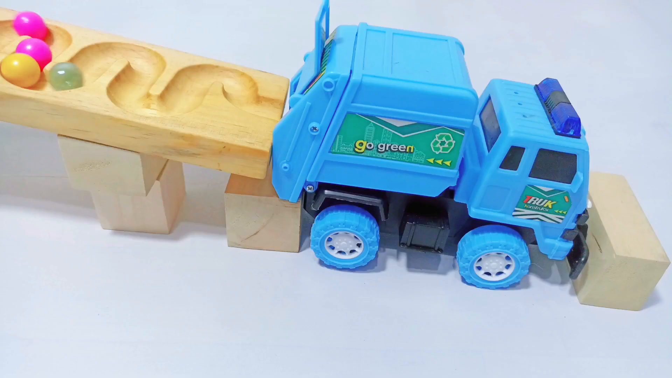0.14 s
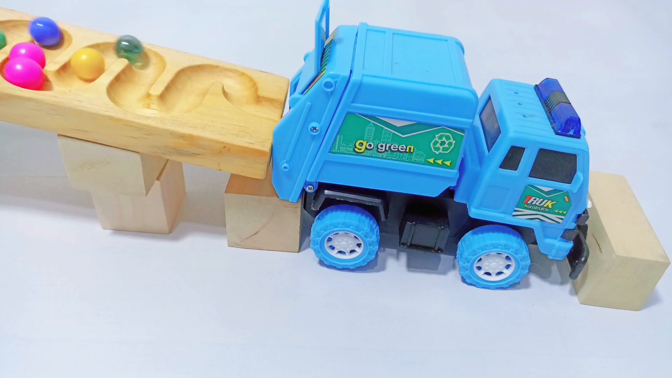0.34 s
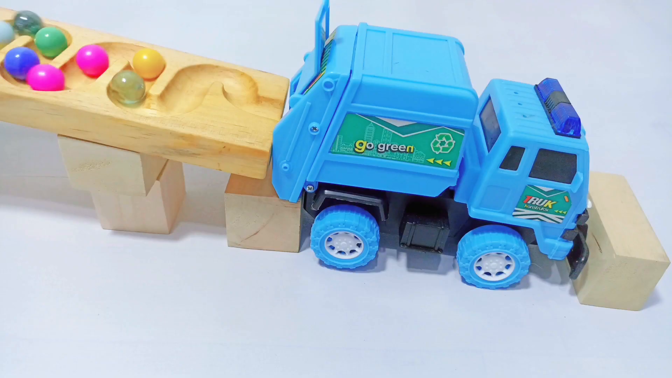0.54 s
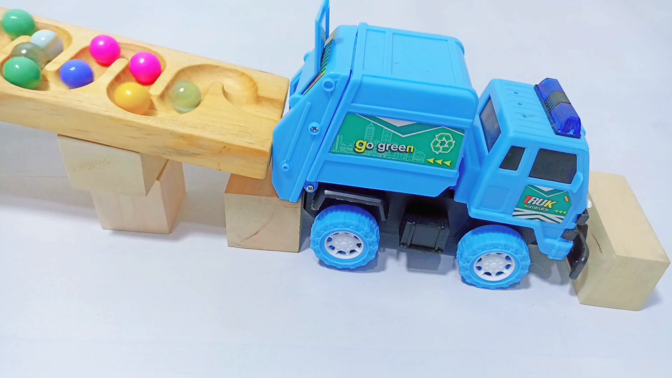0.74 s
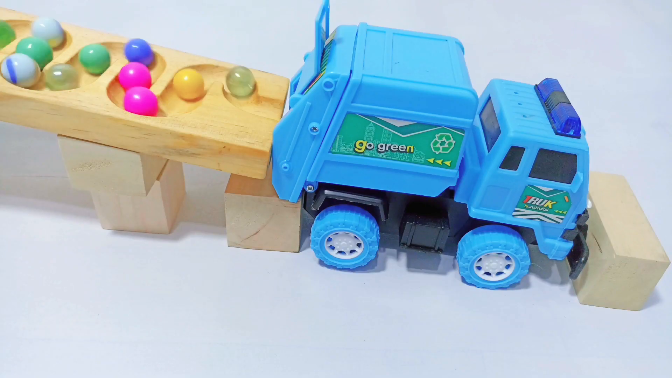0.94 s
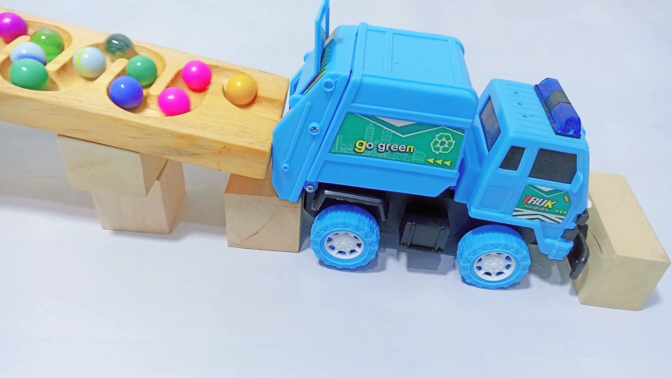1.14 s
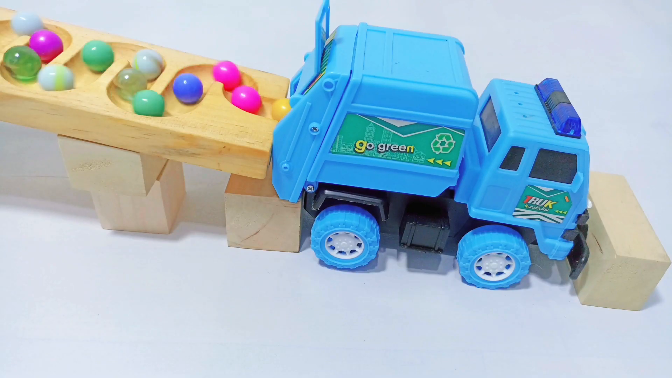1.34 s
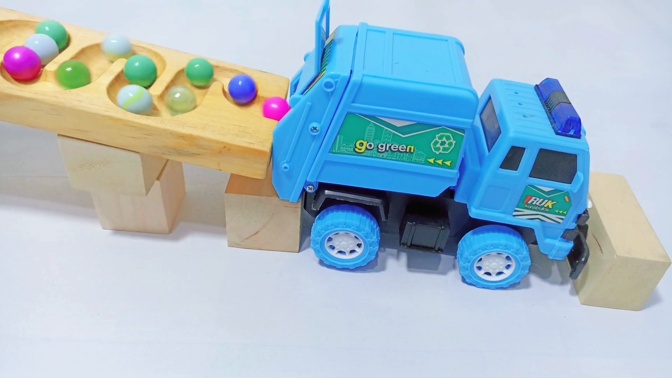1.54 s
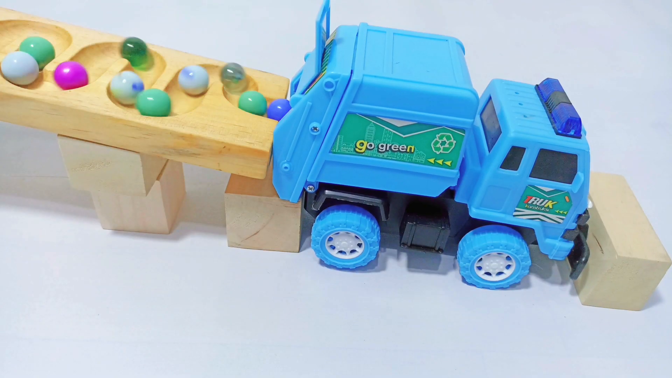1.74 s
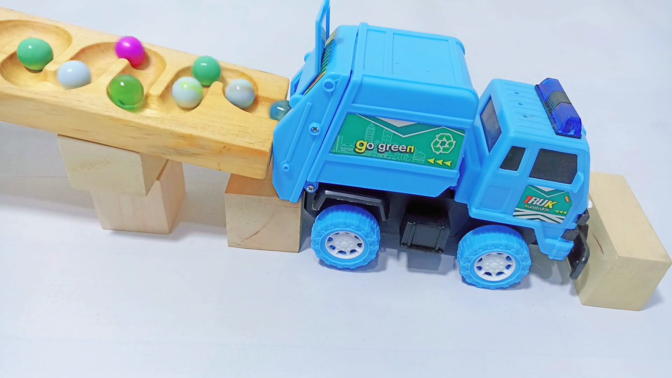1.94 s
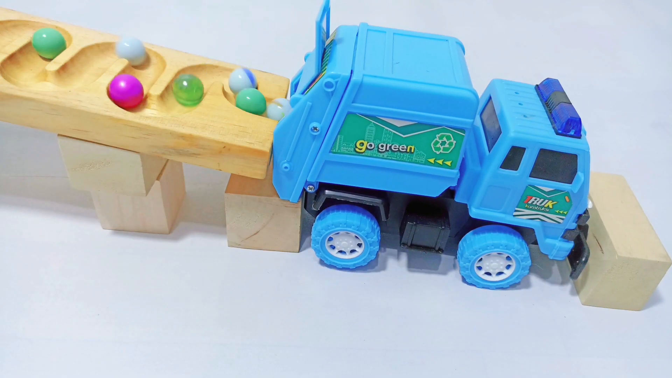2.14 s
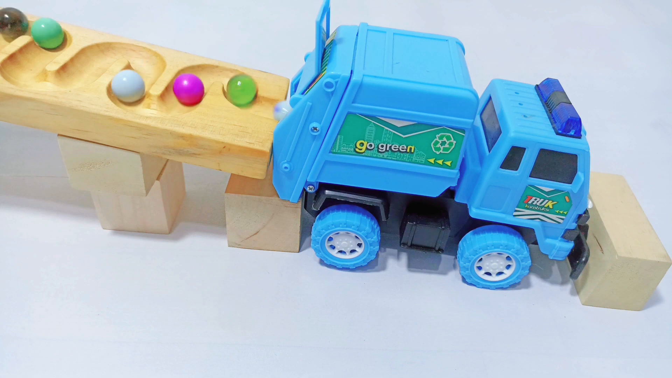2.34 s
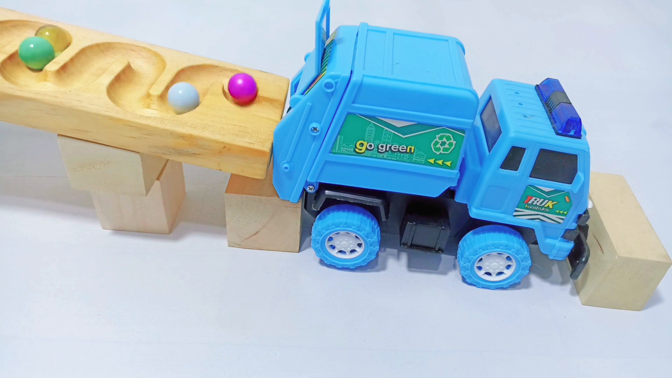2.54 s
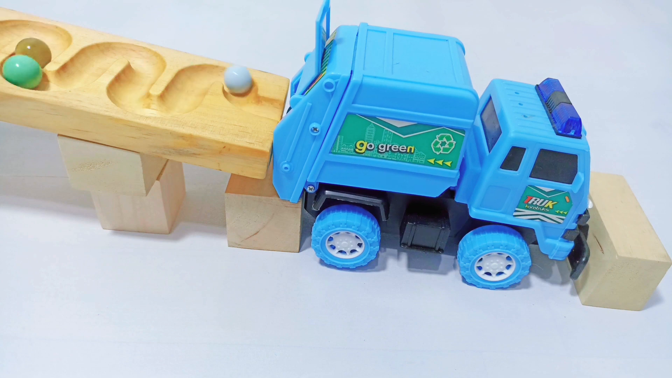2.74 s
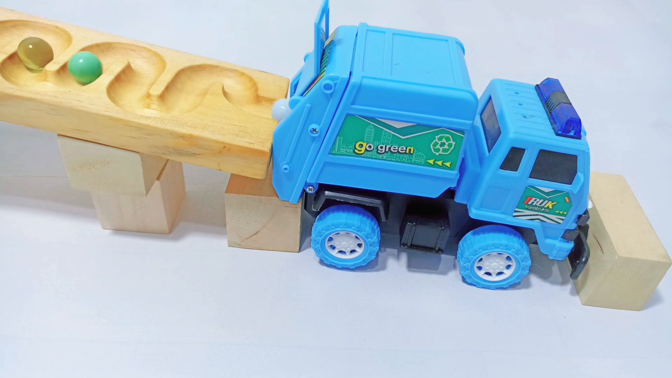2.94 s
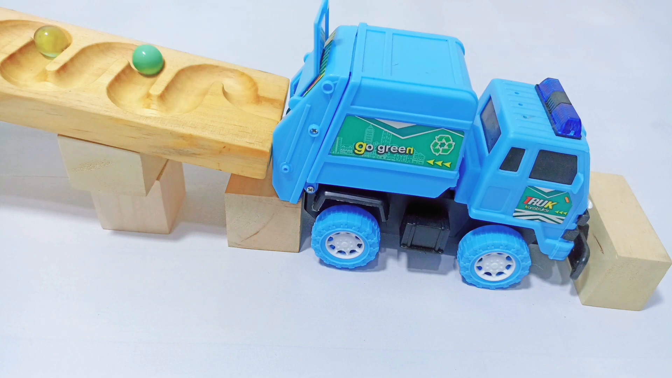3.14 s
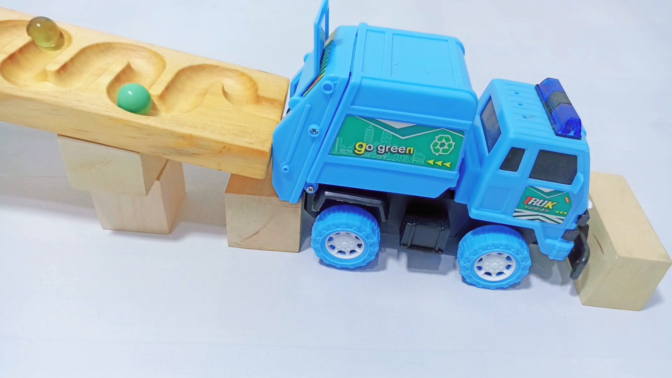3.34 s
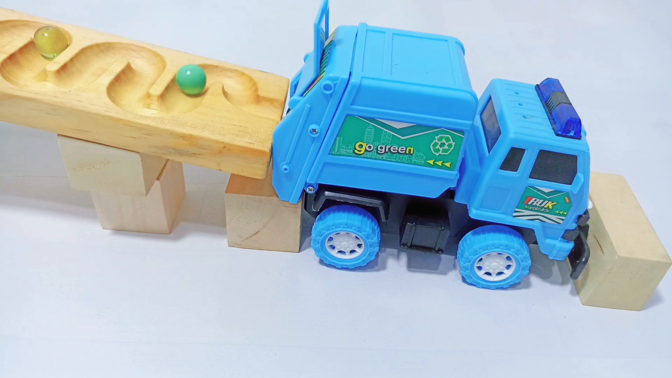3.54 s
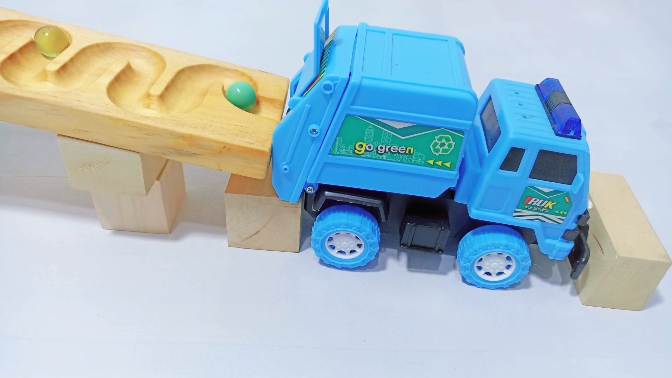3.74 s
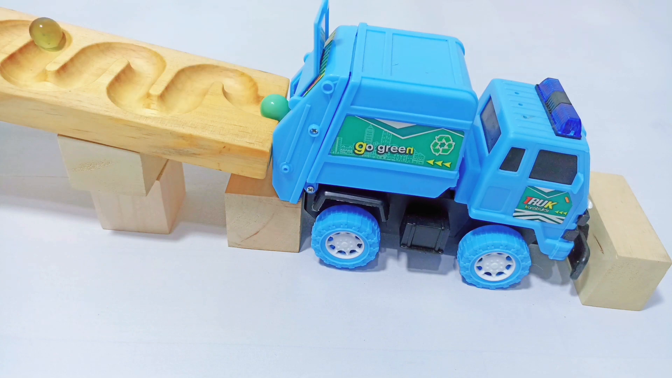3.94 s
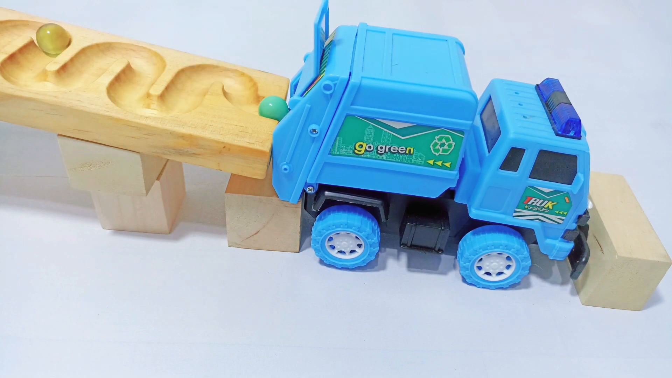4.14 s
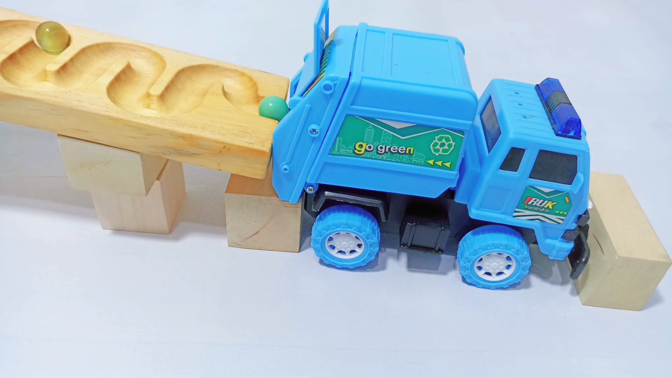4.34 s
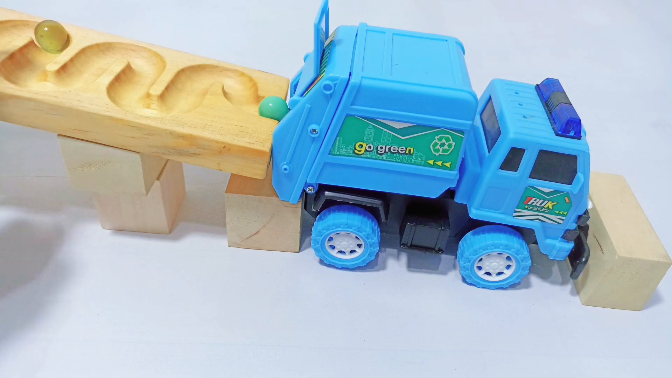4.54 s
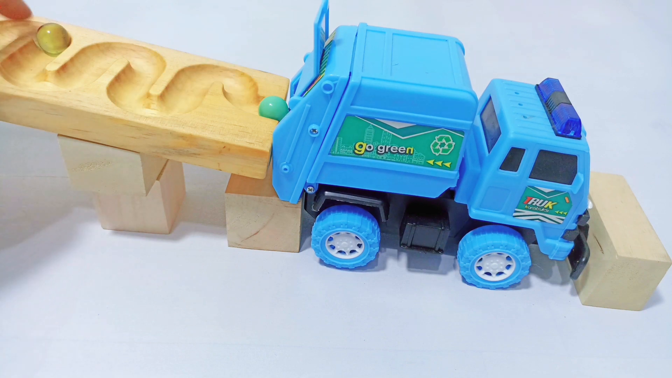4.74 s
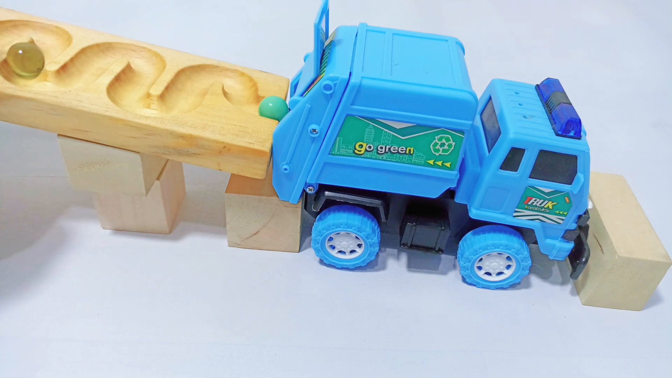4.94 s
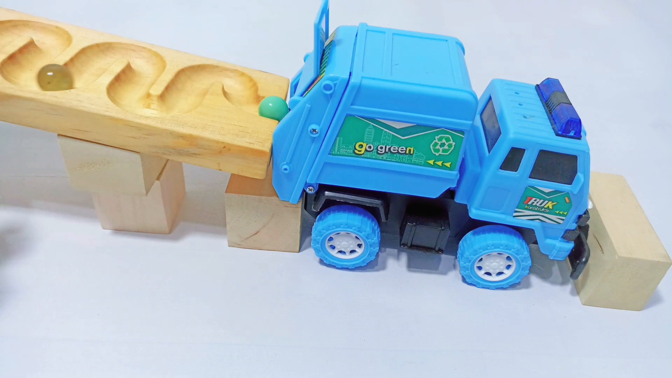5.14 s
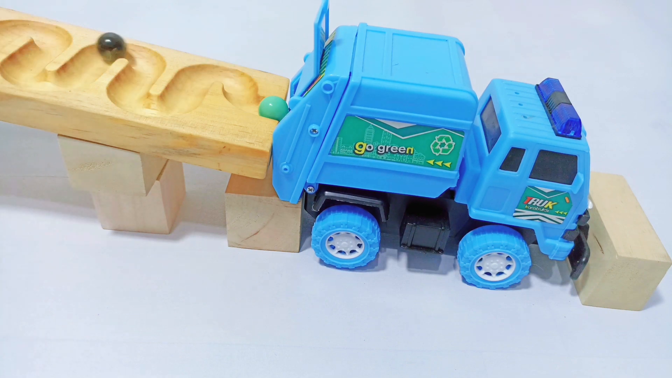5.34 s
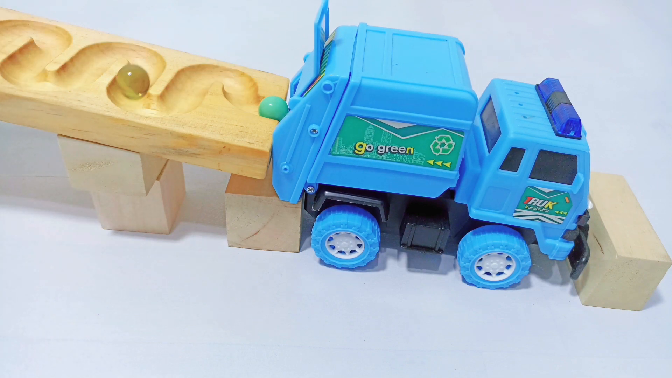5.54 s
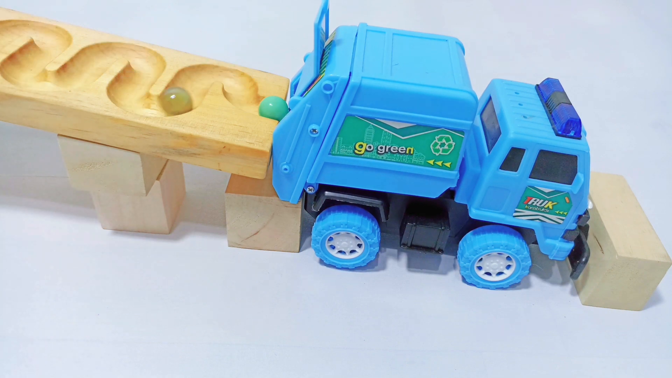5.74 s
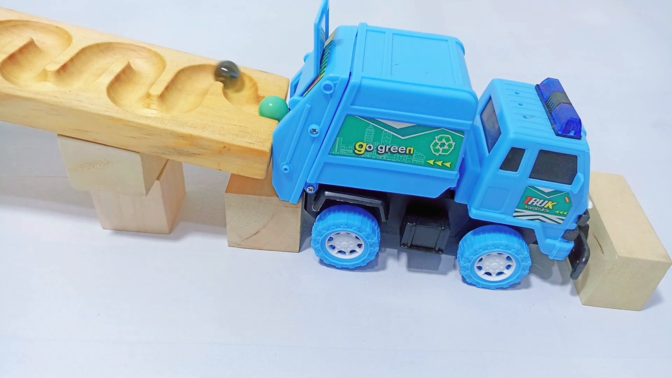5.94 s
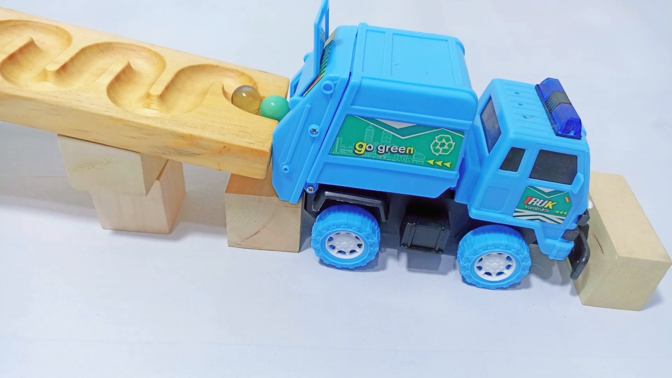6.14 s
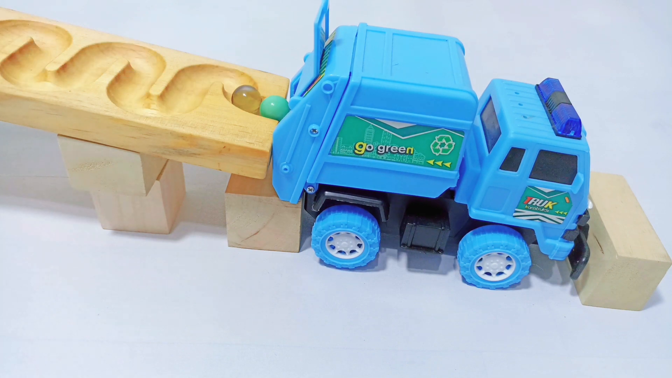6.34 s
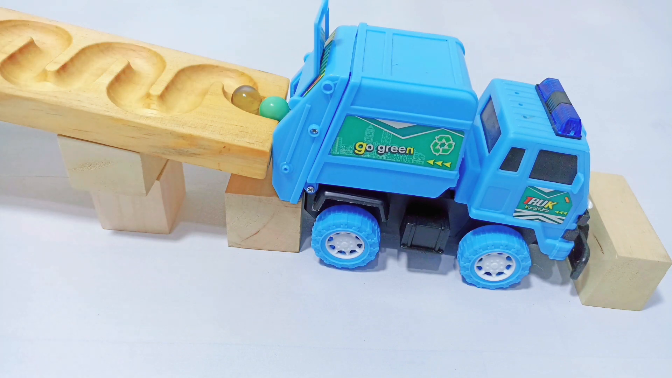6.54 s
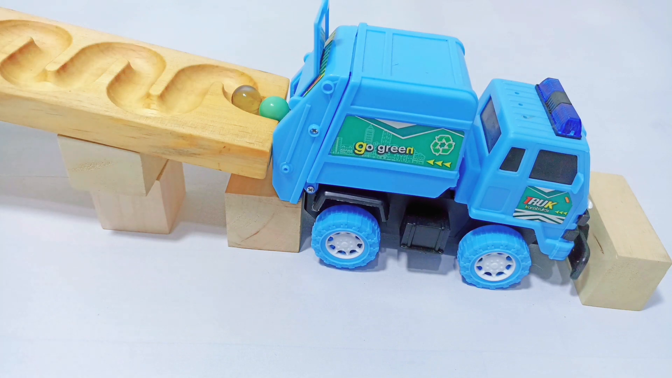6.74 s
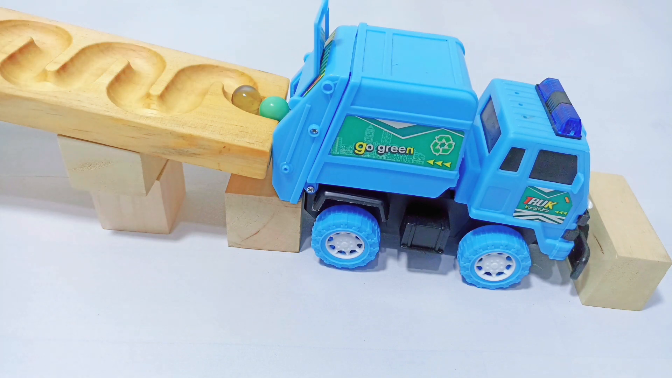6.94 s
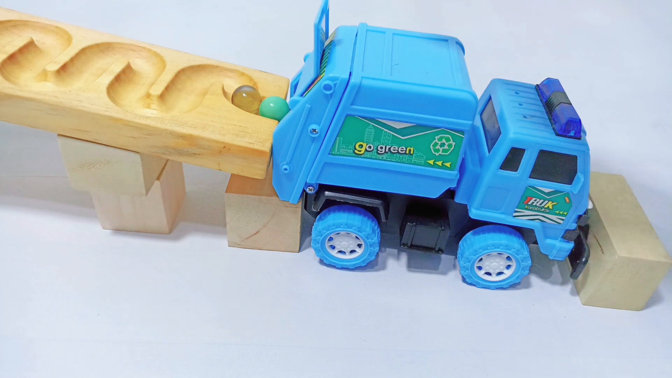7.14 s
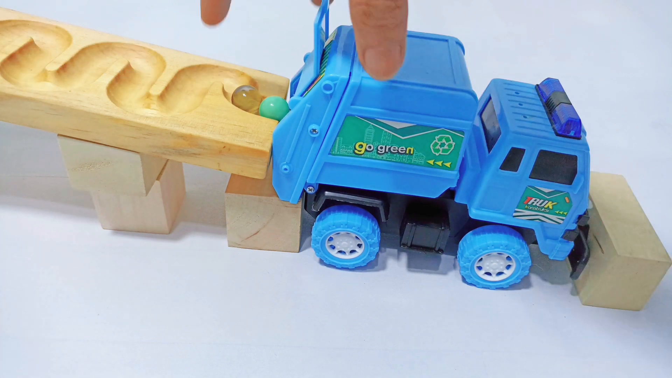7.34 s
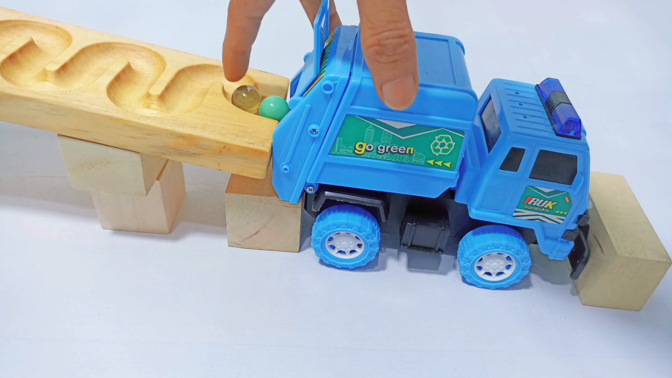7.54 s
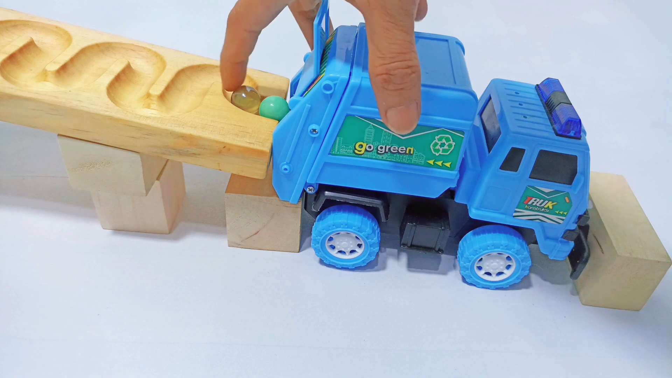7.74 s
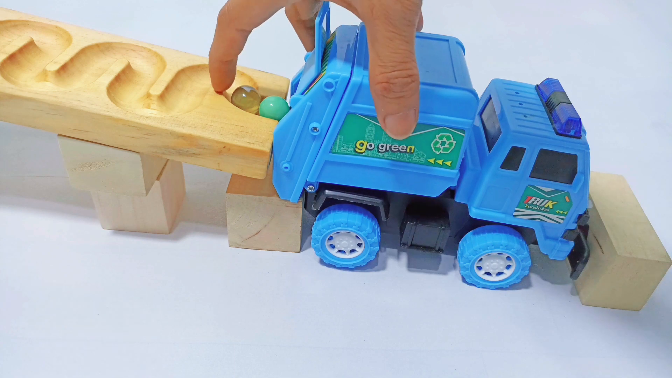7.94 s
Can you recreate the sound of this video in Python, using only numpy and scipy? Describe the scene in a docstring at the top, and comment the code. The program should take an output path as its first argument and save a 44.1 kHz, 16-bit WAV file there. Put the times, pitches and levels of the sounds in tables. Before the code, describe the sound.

A pack of glass marbles rattles down a wooden zigzag ramp and clatters into a hollow plastic bin, then two stragglers roll slowly after.

```python
"""A small quiet room, heard through two close microphone ports: glass marbles roll down a wooden ramp.
They follow its zigzag groove and drop into the hollow plastic bin of a toy truck; two stragglers follow.
Random tiny bumps make the rolling rumble; timed blows make ringing wood knock and ringing plastic clatter.
Short bursts of shaped noise are the glass clicks. At the end fingers rub and squeak on the truck.
Faint squeals, soft air noise and a short room tail lie behind it all."""
import sys
import numpy as np
from scipy import signal
from scipy.fft import rfft, irfft
from scipy.io import wavfile
from scipy.ndimage import uniform_filter1d

SR = 44100
rng = np.random.default_rng(int(sys.argv[2]) if len(sys.argv) > 2 else 0)


def inscribe(sig):
    """Save sig as 16-bit PCM at rate SR to the path in sys.argv[1].

    A 1-D sig is mono; a 2-D sig holds one channel per row.
    Samples are clipped to [-1, 1] before scaling.
    """
    pcm = np.round(np.clip(np.atleast_2d(sig).T, -1, 1) * 32767)
    wavfile.write(sys.argv[1], SR, pcm.astype(np.int16))


N = 356328  # length [samples]
RING = np.arange(4096) / SR  # time within one blow [s]


def amp(db):
    """Turn decibels into a gain."""
    return 10 ** (np.asarray(db) / 20)


def unit(x):
    """Scale a blow so that its energy equals 5 ms of sound at 0 dB."""
    energy = np.mean(np.sum(x ** 2, axis=-1))
    return x / np.sqrt(energy / (0.005 * SR))


def level(x, db):
    """Scale a steady sound to an rms level."""
    return x * amp(db) / np.sqrt(np.mean(x ** 2))


def convolve(x, response):
    """Pass a sound through a response, keeping its length."""
    full = signal.oaconvolve(np.atleast_2d(x), np.atleast_2d(response), axes=-1)
    return full[:, :x.shape[-1]]


def colour(x, points, size=2048):
    """Filter a sound to a (frequency [Hz], level [dB]) shape, with no sound before its cause."""
    hz, db = np.transpose(points)
    grid = np.maximum(np.fft.rfftfreq(size, 1 / SR), 1)
    shape_db = np.interp(np.log(grid), np.log(hz), db)
    # folding the cepstrum forward in time gives the minimum-phase filter
    cepstrum = irfft(np.log(amp(shape_db)))
    cepstrum[1:size // 2] *= 2
    cepstrum[size // 2 + 1:] = 0
    return convolve(x, irfft(np.exp(rfft(cepstrum))))


def split(x, hz):
    """Give the parts of a sound below and above a frequency."""
    filters = [signal.butter(4, hz, kind, fs=SR, output="sos") for kind in ("low", "high")]
    return [signal.sosfilt(sos, x) for sos in filters]


def fade(t, t60):
    """Decay exponentially, 60 dB down after t60 [s]."""
    return np.exp(-np.log(1000) * t / t60)


def walk(rate):
    """Wander smoothly between random values drawn at a rate [per s], with a spread near 1."""
    step = int(SR / rate)
    held = np.repeat(rng.standard_normal(N // step + 1), step)
    return uniform_filter1d(held, step)[:N]


def pair_noise(count, apart_hz):
    """Make noise at the two ports: alike in the bass, unrelated above apart_hz."""
    mid, side = rng.standard_normal((2, count))
    side = signal.lfilter(*signal.butter(1, apart_hz, "high", fs=SR), side)
    return np.array([mid + side, mid - side])


def add(track, s, sound):
    """Mix a sound into a track at time s."""
    start = max(int(s * SR), 0)
    part = sound[:, :N - start]
    track[:, start:start + part.shape[1]] += part


def favour(blow, hz, boost_db, q=5.7):
    """Favour the modes around one pitch by adding that narrow band again."""
    band = signal.lfilter(*signal.iirpeak(hz, max(q, 1), fs=SR), blow)
    return blow + amp(boost_db) * band


def body(modes, crowd, crowd_db, crowd_t60, lead_s, place_db=2.5, detune=0.008, stray=0.32,
         build_cycles=0.5, spread_s=0.0011):
    """Strike a body: clear modes, weighted by a random place of contact, over a crowd of weaker ones."""
    hz, t60, db, lead = np.transpose(modes)[:, :, None]
    weight, shift, phase, skew = rng.standard_normal((4, len(modes), 1))
    turn = 2 * np.pi * hz * (1 + detune * shift) * RING + np.pi * phase
    size = amp(db + place_db * weight) * fade(RING, t60) / np.sqrt(t60)
    size *= 1 - np.exp(-(RING * hz / build_cycles) ** 2)  # low modes take longer to get going
    lead = lead + stray * skew
    clear = np.array([np.sum(size * np.sin(turn + side * lead / 2), axis=0) for side in (1, -1)])
    spread = 1 - np.exp(-(RING / spread_s) ** 2)  # the blow takes a moment to spread over the body
    dense = colour(pair_noise(len(RING), 1600) * fade(RING, crowd_t60) * spread, crowd)
    dense[1] = np.interp(RING - lead_s, RING, dense[1], left=0)  # the crowd is later at the right port
    return unit(clear) + amp(crowd_db) * unit(dense)


def harden(blow, clack_db):
    """A harder contact puts more into the high modes (clack) than into the low ones (boom)."""
    boom, clack = split(blow, 1900)
    return unit(boom) + amp(clack_db) * unit(clack)


def bounce(track, s, db, loss_db, blow, count=3):
    """Play a blow and its two rebounds, each weaker than the last, at roughly even gaps."""
    hop_s, scatter = 0.021, 0.15  # usual gap, and how far chance stretches or shortens it
    for k, chance in enumerate(rng.standard_normal(count)):
        add(track, s, amp(db - k * loss_db) * blow)
        s += hop_s * np.exp(scatter * chance)


def rolling(motion, blow, bumps_per_s, spread_db, sway_db, count=5):
    """Moving contacts ride over tiny bumps; each rings the body from its own place, swelling and easing."""
    out = 0
    for _ in range(count):
        at = np.flatnonzero(rng.random(N) < bumps_per_s / SR)
        size, side = rng.standard_normal((2, len(at)))
        bumps = np.zeros(N)
        bumps[at] = np.sign(side) * amp(spread_db * size + sway_db * walk(14)[at])
        out = out + convolve(bumps, blow())
    return level(out, 0) * motion


# Tone of the still room's air, before its overall level is set: (frequency [Hz], level [dB per Hz])
AIR_TONE = [(20, -21), (48, -14.5), (65, 4.5), (100, 8.5), (200, 1), (320, -4.5), (500, -12), (1000, -19.5),
            (2200, -19), (3300, -24.5), (5000, -24.5), (8000, -31.5), (12000, -38), (16000, -37.5)]


def room_air(air_db=-56.5):
    """A low room rumble with thin hiss, made of filtered noise that swells slowly."""
    swell = amp(1.2 * walk(2.4))
    return level(colour(pair_noise(N, 130), AIR_TONE), air_db) * swell


# Faint far-off squeals: (time [s], length [s], middle pitch [Hz], level before its flutter [dB])
FAR_SQUEALS = [(6.99, 0.16, 2460, -67), (7.14, 0.12, 2450, -78), (7.668, 0.22, 2363, -68),
               (7.85, 0.08, 2365, -70.5)]


def far_squeals(octave_db=-10, sag=0.0063):
    """Wavering tones with a weak octave above; their pitch arches up and down a little."""
    out = np.zeros((2, N))
    for s, length, hz, db in FAR_SQUEALS:
        u = np.linspace(0, 1, int(length * SR))  # progress through the squeal, 0 to 1
        pitch = hz * (1 - sag * (2 * u - 1) ** 2 + 0.0044 * walk(54)[:len(u)])
        phase = 2 * np.pi * np.cumsum(pitch) / SR
        swell = np.sin(np.pi * u) * amp(db + 4.4 * walk(35)[:len(u)])
        tone = np.sin(phase) + amp(octave_db) * np.sin(2 * phase)
        add(out, s, swell * np.array([tone]))
    return out


def room(x, wet_db=-6, t60=0.38, build_s=0.0099, treble_db=-4):
    """The walls answer after some milliseconds with a short, even tail of decaying noise."""
    t = np.arange(SR // 2) / SR
    tail = pair_noise(len(t), 500) * fade(t, t60) * (1 - np.exp(-(t / build_s) ** 4))
    tail /= np.sqrt(np.sum(tail ** 2) / 2)
    tone = [(150, 9.0), (800, -1.0), (3000, 0.7), (7000, 0.0), (12000, treble_db)]
    return amp(wet_db) * colour(convolve(x, tail), tone)


# Clear notes of the plastic bin:
# (frequency [Hz], time to fade by 60 dB [s], relative energy [dB], lead of the left port [radians])
BIN_MODES = [(244, 0.15, -24, 0), (498.3, 0.042, -9.5, -0.5), (737, 0.051, 1, 0.99), (783, 0.025, -3.5, 0),
             (854, 0.036, -2.5, 0.16), (956.6, 0.059, -7, 1), (1042, 0.049, -8.5, 0.5),
             (1224, 0.023, -2.5, 0.5), (1499, 0.018, -7.5, 4), (2055, 0.0093, -18.5, 0.5),
             (2602, 0.018, -9.5, 1), (3060, 0.011, -11, -3), (3270, 0.024, -10, -1.2),
             (3932, 0.013, -12.5, -3), (4400, 0.013, -8.5, 1.5), (5430, 0.0046, -19.5, 2.5)]
# The crowd of weaker notes between those, before its overall level is set:
# (frequency [Hz], level [dB per Hz])
BIN_CROWD = [(80, -29.5), (330, -19), (550, -13), (850, -1), (1300, -1), (1900, -8), (3200, -8.5),
             (4500, -12), (7000, -16), (10000, -24), (16000, -30.5)]


def plastic(**contact):
    """One blow on the hollow bin wakes its clear notes and the crowd between them."""
    return body(BIN_MODES, BIN_CROWD, **contact)


# Fingers rub on the truck as they take hold of it: (time [s], level [dB])
FINGER_RUB = [(7.94, -110), (7.985, -80.5), (8.02, -72), (8.08, -81)]


def fingers(slip_hz=850, glide_octaves_per_s=7, jitter=0.049, squeak_db=3):
    """Soft skin drags and wakes mostly low modes; it sticks and slips ever faster as the grip tightens."""
    t = np.arange(N) / SR
    soft = lambda: harden(plastic(crowd_db=2.5, crowd_t60=0.02, lead_s=0), clack_db=-18.5)
    drag = amp(np.interp(t, *np.transpose(FINGER_RUB), left=-200))
    glide_s = np.maximum(t - FINGER_RUB[1][0], 0)  # the pitch climbs from the second point on
    rate = slip_hz * 2 ** (glide_octaves_per_s * glide_s) * (1 + jitter * walk(700))
    squeak = amp(squeak_db) * drag * np.sin(2 * np.pi * np.cumsum(rate) / SR)
    return rolling(drag, soft, bumps_per_s=720, spread_db=2.5, sway_db=0, count=1) + squeak


# Tone of glass touching glass, before its overall level is set: (frequency [Hz], level [dB per Hz])
GLASS_TONE = [(200, -18), (1300, -8), (3000, -6), (4400, -1.5), (5600, 4.5), (6900, 3.5), (8200, 1.5),
              (9500, -1.5), (11500, -2.5), (13200, -4), (14500, -9), (16500, -5.5)]


def tick(scatter_db, contact_t60=0.004, scatter_t60=0.022):
    """Glass contact: a snap lasting a few milliseconds, then its weaker scatter off the nearby walls."""
    shape = fade(RING, contact_t60) + amp(scatter_db) * fade(RING, scatter_t60)
    return unit(colour(rng.standard_normal((2, len(RING))) * shape, GLASS_TONE))


# Two marbles meet: (time [s], level before the shared trim [dB], boost of the top octave [dB])
GLASS_CLICKS = [(0.04, -43, -4), (.138, -40.5, -4.5), (0.205, -39.5, -11), (0.391, -41.5, 0.5),
                (0.45, -42.5, -14), (0.4688, -42.5, -6.5), (0.848, -40, -9), (0.854, -43, -10),
                (1.0136, -35.5, -7.5), (1.172, -34, -12.5), (1.235, -38, -9), (1.3806, -33.5, -2),
                (1.384, -35, -1.5), (1.679, -36, -4.5), (1.7793, -36, 5.5), (1.856, -39, -7.5),
                (2.132, -37.5, -3), (2.286, -36.5, -9.5), (2.385, -35.5, -4), (2.428, -30, 4.5),
                (2.4713, -35.5, -5), (2.670, -32, -7.5), (3.114, -47, 4), (3.6127, -47.5, -7),
                (3.7063, -38.5, 2), (3.718, -50, 0), (3.727, -52, -7), (3.9042, -52.5, -2),
                (4.0233, -41.5, -7), (4.1305, -54, 0), (4.22, -45, 5), (4.2287, -50, 11),
                (4.233, -36.5, 6.5), (4.257, -43, -5), (4.269, -36.5, -1.5), (4.313, -56, -10),
                (4.4506, -50.5, -3), (4.4898, -45, 5), (4.566, -51.5, -1), (4.762, -47.5, 0),
                (5.014, -55, 3), (6.19, -34, 4), (6.379, -52, -4)]


def marbles(click_db=4.5, right_db=-1.0):
    """Glass clicks against glass, a little to the left; each click has its own amount of top."""
    out = np.zeros((2, N))
    for s, db, top_db in GLASS_CLICKS:
        click = colour(tick(scatter_db=-16), [(9500, 0), (12000, top_db)])
        add(out, s, amp(db + click_db) * click)
    return out * amp([[0], [right_db]])


# Clear notes of the wooden ramp:
# (frequency [Hz], time to fade by 60 dB [s], relative energy [dB], lead of the left port [radians])
RAMP_MODES = [(178, 0.082, -0.5, -0.9), (248.1, 0.18, -9.5, -1), (506.4, 0.081, -6.5, 0.5),
              (596, 0.064, -5.5, 0), (738, 0.022, -3, 0.9), (906, 0.036, -1.5, 1), (1007, 0.036, -5, -1.3),
              (1296, 0.046, 1.5, 3.5), (1512, 0.013, 3.5, 3), (1898, 0.035, -10.5, -2.5),
              (2338, 0.024, -4.5, -2), (2708, 0.029, -5.5, 1), (3400, 0.03, -13.5, -1.5),
              (4100, 0.029, -17, 0.5), (4680, 0.018, -23, 1), (5850, 0.016, -26, 1)]
# The crowd of weaker notes between those, before its overall level is set:
# (frequency [Hz], level [dB per Hz])
RAMP_CROWD = [(60, -25.5), (170, -6), (330, 2.5), (850, 11.5), (1800, -0.5), (2700, -3), (3600, -16.5),
              (4500, -17), (7000, -27), (10000, -41), (16000, -47)]


def wood():
    """One blow on the ramp wakes the board's clear notes and the crowd between them."""
    return body(RAMP_MODES, RAMP_CROWD, crowd_db=-3, crowd_t60=0.024, lead_s=0.00032)


# A marble, or a pack of them, rolls freely along the groove; levels are before the shared trim:
# (start time [s], end time [s], level at the start [dB], level at the end [dB])
RAMP_RUNS = [(0.032, 1.45, -39, -41), (1.457, 2.602, -40, -39.5), (2.873, 3.316, -41.5, -48.5),
             (3.567, 4.107, -55.5, -53), (4.965, 5.043, -49, -54.5), (5.25, 5.444, -66.5, -51),
             (5.62, 6.199, -59, -52)]


def groove_motion(attack_s=0.0065, coast_t60=1):
    """Strength of rolling on the ramp: each run sets in, swells or eases evenly, then coasts to a stop."""
    t, power = np.arange(N) / SR, 0
    for start, end, first_db, last_db in RAMP_RUNS:
        strength = amp(np.interp(t, [start, end], [first_db, last_db]))
        run = np.clip((t - start) / attack_s, 0, 1) * strength
        power = power + (run * fade(np.maximum(t - end, 0), coast_t60)) ** 2
    return np.sqrt(power)


# A marble knocks on a wall or a ridge of the groove:
# (time [s], level before the shared trim [dB], clack above the boom [dB], pitch the spot favours [Hz])
RAMP_KNOCKS = [(0.028, -35.5, 4.5, 2750), (0.039, -29.5, 4, 2790), (0.0495, -34, 10, 2750),
               (0.077, -32.5, -2, 2250), (0.0857, -28.5, 4, 2230), (0.1455, -33, 1, 2280),
               (0.2316, -29, 21, 2760), (0.2573, -33.5, 0, 2760), (0.283, -27.5, 12, 2300),
               (0.3094, -40, -8, 2750), (0.331, -34.5, -5, 2250), (0.374, -38, 22, 2750),
               (0.4018, -22.5, 20, 3430), (0.419, -27, 17, 2320), (0.423, -27, 13, 4220),
               (0.44, -36, 2, 2260), (0.459, -35, -5, 2750), (0.5038, -32, -5, 2660),
               (0.544, -23, 16, 2800), (0.5673, -23, 13, 2800), (0.5887, -25, 8, 2410),
               (0.6388, -27, 20, 3350), (0.6483, -32, 21, 2280), (0.6594, -29.5, 7, 2710),
               (0.7148, -27.5, 16, 3430), (0.7185, -24, 8, 2380), (0.737, -30.5, -1, 2740),
               (0.758, -32, -1, 3460), (0.8514, -25.5, 15, 2270), (0.8868, -32.5, -0.5, 2280),
               (0.9739, -25, 11.5, 2390), (1, -28.5, 16.5, 2330), (1.028, -37, 10, 2750),
               (1.05, -44, -8, 2300), (1.063, -39, -6.5, 2300), (1.085, -35.5, -6, 2060),
               (1.1017, -30.5, 13.5, 2720), (1.1119, -26.5, 12, 2300), (1.1342, -27.5, 12, 2380),
               (1.147, -29.5, 13, 2670), (1.1586, -30, 5.5, 2690), (1.2356, -24, 10, 2290),
               (1.4097, -41, 23, 2760), (1.4322, -24.5, 18, 2800), (1.581, -25.5, 12, 2830),
               (3.3047, -52, -12, 2730), (3.3748, -47, -1, 2760), (3.4017, -46, -5, 2760),
               (3.6288, -49, 7, 2800), (3.672, -57, -2, 2760), (3.7075, -40.5, 8, 2750),
               (3.7862, -55, -18, 2660), (3.847, -37, 3, 2880), (3.9232, -38, -2, 2680),
               (3.974, -24.5, 4, 2740), (3.993, -34, 18, 2650), (4.0206, -31.5, 34, 3200),
               (4.1013, -38, 9, 2680), (4.1122, -41, 8, 2690), (4.196, -41, 6, 2080),
               (4.2899, -43, 4, 2750), (4.3125, -47.5, 5, 2750), (4.327, -51, 6, 3460),
               (4.958, -36, 0, 2300), (4.9797, -47, -12, 2390), (5.1205, -52.5, -9.5, 2000),
               (5.3605, -65, -22, 2810), (5.4019, -48, -4, 2310), (5.4461, -29, 12, 2330),
               (5.4645, -36, 1.5, 2330), (5.5048, -48, -12, 2210), (5.5972, -51, -10, 2770),
               (5.6703, -50, 5, 1980), (5.6957, -53, -5, 2220), (5.727, -61, -8, 2240),
               (5.798, -37, 19, 4800), (5.8271, -45, 9, 2730), (5.903, -42, 6, 2800),
               (5.9324, -42, 0, 2730), (5.9719, -39, 0, 2770), (6.005, -34.5, 11, 2690),
               (6.0247, -36.5, 4, 1990), (6.098, -48, 0, 2630), (6.1272, -44, 3, 2710),
               (6.1398, -33.5, 9, 2700), (6.1516, -37.5, 8, 2780), (6.2085, -32.5, 7, 2770),
               (6.348, -51, 15, 3460), (6.3764, -33, 5.5, 2000)]
# How the board's own note swells as marbles pass places that wake it: (time [s], level of added band [dB])
BOARD_NOTE = [(0.1, -6), (3.15, 2), (3.35, 4.5), (3.65, -8), (3.95, 5), (4.959, 2.5), (5.68, 7), (5.92, -8)]


def ramp(knock_db=-1.65, roll_db=-1.8, roll_clack_db=-7.0, spot_db=2, rebound_loss_db=19,
         note_hz=1517, note_q=13):
    """Wood rumbles under the marbles, knocks at a bend or a ridge, and sings one hollow note."""
    # many places along the groove sway in strength, so the colour of the rumble keeps shifting
    rumble = rolling(groove_motion(), lambda: harden(wood(), roll_clack_db),
                     bumps_per_s=130, spread_db=2.5, sway_db=3.0, count=6)
    out = amp(roll_db) * rumble
    for s, db, clack_db, hz in RAMP_KNOCKS:
        knock = unit(harden(favour(wood(), hz, spot_db), clack_db))
        bounce(out, s, db + knock_db, rebound_loss_db, knock)
    note_db = np.interp(np.arange(N) / SR, *np.transpose(BOARD_NOTE))
    return favour(out, note_hz, note_db, note_q)


# Clear notes of the truck's frame:
# (frequency [Hz], time to fade by 60 dB [s], relative energy [dB], lead of the left port [radians])
FRAME_MODES = [(241, 0.041, -2, .2), (304, 0.027, -0.5, 0.38), (514, 0.0089, 2, 0.46)]
# The last marble settles and nudges the whole truck: (time [s], level [dB])
TRUCK_NUDGES = [(6.376, -43)]


def truck_frame():
    """A nudge rings the frame's short low notes, over the same crowd of weaker notes as the ramp."""
    out = np.zeros((2, N))
    for s, db in TRUCK_NUDGES:
        add(out, s, amp(db) * body(FRAME_MODES, RAMP_CROWD, crowd_db=-6, crowd_t60=0.02, lead_s=0))
    return out


def bin_motion(last_s=3.5, rise_s=0.033, rest_t60=0.32):
    """Strength of rolling in the bin: each drop sets a marble going; after last_s they lodge at the lip."""
    t, power = np.arange(SR) / SR, np.zeros((1, N))
    roll = (1 - np.exp(-t / rise_s)) * fade(t, rest_t60)
    for s, db, *_ in BIN_HITS:
        if s < last_s:
            add(power, s, (amp(db) * roll[None]) ** 2)
    return np.sqrt(power[0])


# A marble drops on the plastic bin; level and tick are before their shared trims:
# (time [s], level [dB], clack above the boom [dB], glass tick above the boom [dB],
#  pitch the spot favours [Hz])
BIN_HITS = [(1.263, -21.5, 0.5, -4.5, 1234), (1.3023, -42, 3.5, -23, 1100), (1.316, -26.5, 2, -21, 1260),
            (1.3462, -29, -5, -10.5, 893), (1.384, -30.5, 4, -7.5, 723), (1.4106, -35.5, 3, -13, 776),
            (1.4993, -26.5, -2, -21.5, 912), (1.5035, -25, -5.5, -26, 872), (1.5351, -28.5, -0.5, 2.5, 751),
            (1.5591, -31.5, -9, -21.5, 743), (1.5934, -32, -25.5, -26, 761), (1.603, -24.5, 1, -24.5, 875),
            (1.6276, -21.5, -25, -34, 734), (1.649, -24, -5, -12.5, 750), (1.6685, -27, -12.5, -20, 762),
            (1.6833, -31, -14, -22.5, 740), (1.7054, -21.5, 0.5, -8.5, 1270),
            (1.7479, -32, 0.5, -13.5, 852), (1.758, -24, -2.5, -13.5, 720),
            (1.782, -23.5, -2.5, -17.5, 865), (1.8036, -21, -4, -25.5, 927),
            (1.8385, -30.5, -13.5, -26.5, 796), (1.8452, -18, -8.5, -11, 898),
            (1.872, -25.5, -12.5, -16, 870), (1.8827, -23, -6.5, -14.5, 788),
            (1.9114, -26.5, 0.5, -12, 900), (1.9159, -27, 0.5, -10.5, 924),
            (1.9509, -29.5, 3.5, -13.5, 760), (1.9692, -27, -16.5, -23, 777), (2.003, -24, -0.5, -24, 874),
            (2.0353, -24.5, -13.5, -33, 750), (2.0505, -26.5, -2.5, -10, 790),
            (2.0685, -30.5, -7, -16, 787), (2.0916, -20.5, 0, -15, 1240), (2.1417, -24.5, 0.5, -9, 751),
            (2.1572, -24, -5, -3, 787), (2.164, -22, -1, -7, 903), (2.173, -27, -7.5, -12.5, 906),
            (2.1915, -24.5, -3.5, -12, 897), (2.2049, -30.5, 2.5, -12, 802), (2.218, -27.5, -2, -4.5, 814),
            (2.2284, -26.5, -8.5, -15, 758), (2.3045, -22.5, -9.5, -26.5, 884),
            (2.314, -21, -3.5, -18, 859), (2.3205, -26.5, -2, -16.5, 900), (2.336, -25, -7, -16.5, 838),
            (2.357, -26.5, -4.5, -17, 850), (2.4051, -23, -5, -21.5, 871), (2.4125, -28.5, -2, -15, 892),
            (2.4438, -32.5, 3, -13, 847), (2.4711, -29.5, -5, -7.5, 820), (2.4884, -26.5, -4.5, -18.5, 734),
            (2.4975, -21.5, -5, -3.5, 760), (2.516, -25, -9.5, -19, 799), (2.5274, -29.5, -2.5, -17, 826),
            (2.5695, -23.5, -20, -10.5, 734), (2.577, -26, -11, -18, 773), (2.602, -26.5, -3, -1.5, 836),
            (2.608, -27.5, -2.5, -10, 800), (2.6272, -20.5, -17, -9.5, 793), (2.6402, -23.5, 3.5, -11, 749),
            (2.684, -21.5, -6, -13, 955), (2.6914, -23.5, -5, -3.5, 909), (2.8121, -30.5, -1.5, -0.5, 950),
            (2.843, -21.5, 1, -17, 1290), (2.8848, -27, -10, -13, 810), (2.8953, -33, 0, -20, 800),
            (3.0314, -33.5, 1, -1, 785), (3.0405, -30.5, -2, 0.5, 710), (3.0581, -36.5, 2.5, -8, 788),
            (3.0675, -36, -6, 0, 820), (3.1125, -34.5, -3, -7, 800), (3.1234, -25.5, -8.5, -32, 925),
            (3.1348, -34.5, 6, -15, 764), (3.157, -36.5, 1.5, -18, 784), (3.168, -31, -17, -30, 780),
            (3.1972, -25.5, -9, -13, 760), (3.213, -25.5, -16.5, -10, 736), (3.2222, -37.5, -20, -2, 740),
            (3.9477, -27.5, 2, -0.5, 766), (4.2315, -57, 4.5, -8, 900), (4.267, -51, 7, -8, 895),
            (6.1898, -30, 2, -5, 920)]


def truck_bin(hit_db=0.5, roll_db=-18, roll_clack_db=-10, glass_db=-4, spot_db=-1.0, rebound_loss_db=20):
    """Marbles drop on hollow plastic, each on its own spot, bounce, and roll about among the others."""
    stiff_spot_hz, high_ring_hz, high_ring_db = 1233, 3210, 1.5  # ring level is for the stiff spot
    shell = lambda: plastic(crowd_db=-3.5, crowd_t60=0.036, lead_s=0.00012, detune=0.024)
    rumble = rolling(bin_motion(), lambda: harden(shell(), roll_clack_db),
                     bumps_per_s=35, spread_db=3, sway_db=1.0)
    out = amp(roll_db) * rumble
    for s, db, clack_db, tick_db, hz in BIN_HITS:
        # the stiffer, higher-pitched the spot, the more it also wakes a high ring
        ring_db = high_ring_db + 80 * np.log10(hz / stiff_spot_hz)
        blow = favour(shell(), hz, spot_db)
        blow = favour(blow, high_ring_hz, ring_db, q=7)
        glass = amp(tick_db + glass_db) * tick(scatter_db=-13)
        bounce(out, s, db + hit_db, rebound_loss_db, harden(blow, clack_db) + glass)
    return out


def scene():
    """Fingers, marbles, ramp and truck sound in the room, over its air and the far squeals."""
    direct = fingers() + marbles() + ramp() + truck_frame() + truck_bin()
    return direct + room(direct) + room_air() + far_squeals()


# Tone of each microphone port; the left one resonates in the top octave: (frequency [Hz], level [dB])
LEFT_PORT = [(100, -4.5), (900, 3), (1450, -1.5), (2400, -1), (3200, 1.5), (4200, -3.5), (8000, -2),
             (10000, 2.5), (11400, 7), (11900, 12.5), (13200, 10.5), (15000, 7.5), (16000, -12)]
RIGHT_PORT = [(100, -5), (900, 2), (1450, -1), (2400, -2.5), (3200, 0), (4200, -3), (8000, -0.5),
              (10000, 0.5), (11400, -3), (11900, 3), (13500, 2), (15000, -10.5), (16000, -26)]


def record(dry, bass_hz=62, top_hz=16600):
    """Each port colours the sound; the deep bass and the top are cut."""
    heard = np.vstack([colour(dry[0], LEFT_PORT), colour(dry[1], RIGHT_PORT)])
    heard = signal.sosfilt(signal.butter(1, bass_hz, "high", fs=SR, output="sos"), heard)
    return signal.sosfilt(signal.ellip(10, 0.2, 80, top_hz, fs=SR, output="sos"), heard)


dry = scene()
out = record(dry)
inscribe(out)
```